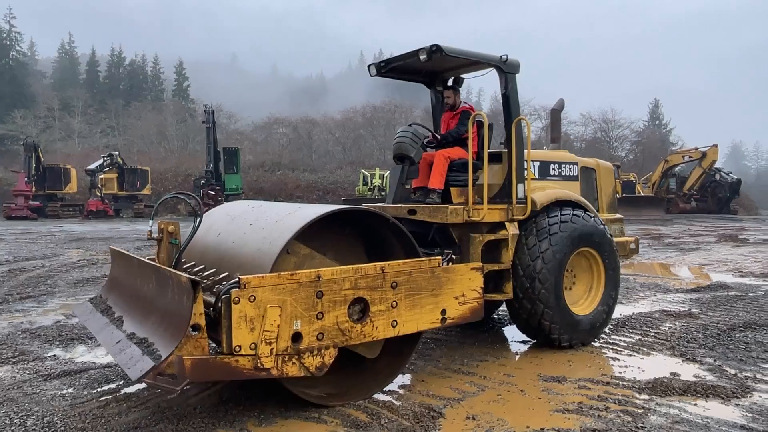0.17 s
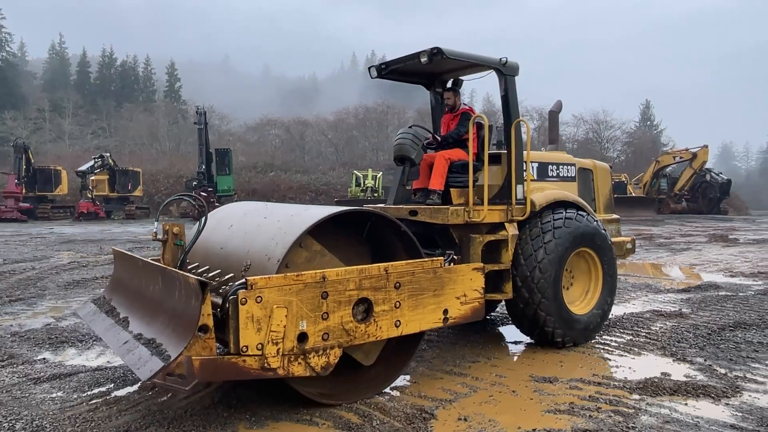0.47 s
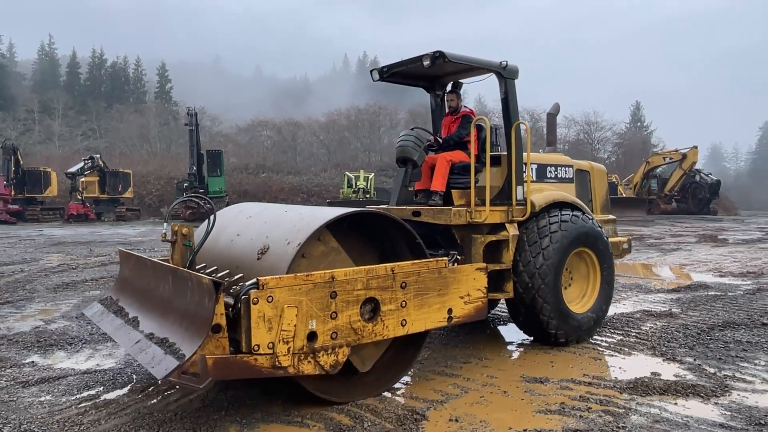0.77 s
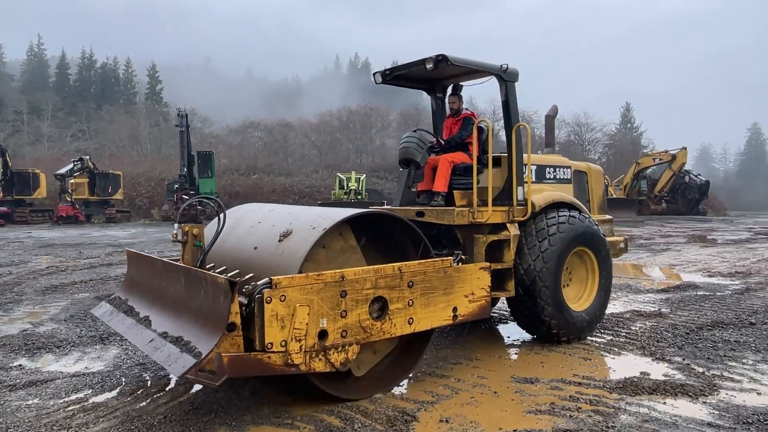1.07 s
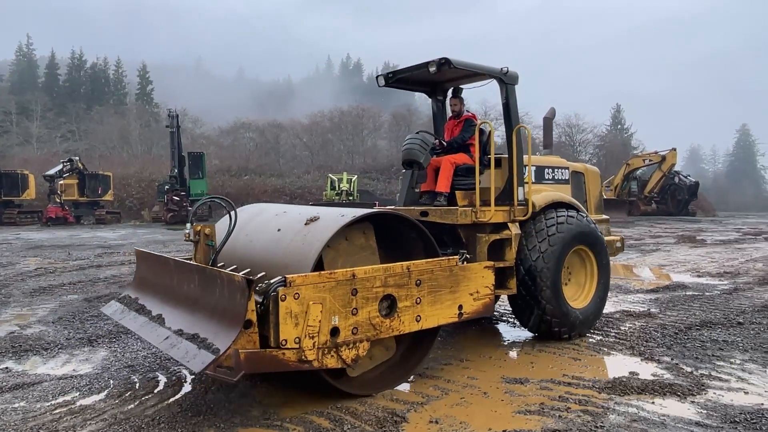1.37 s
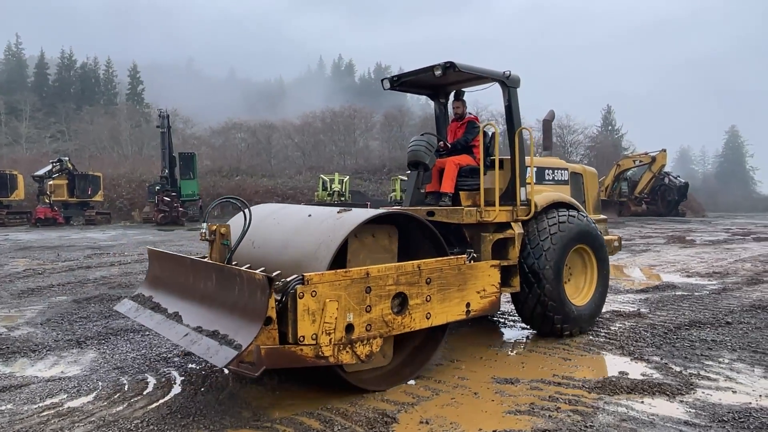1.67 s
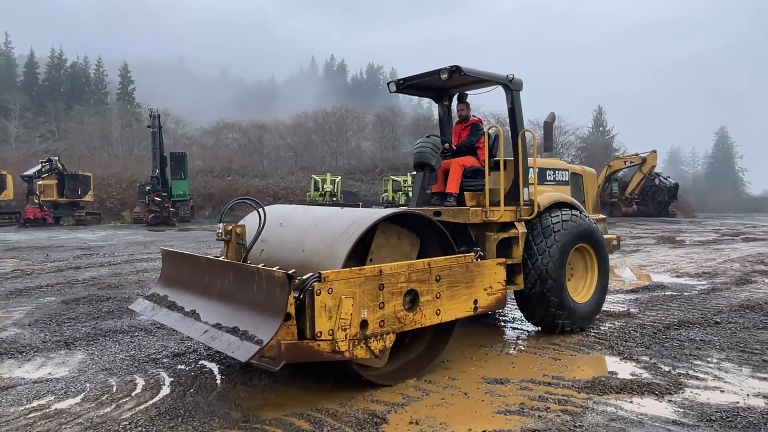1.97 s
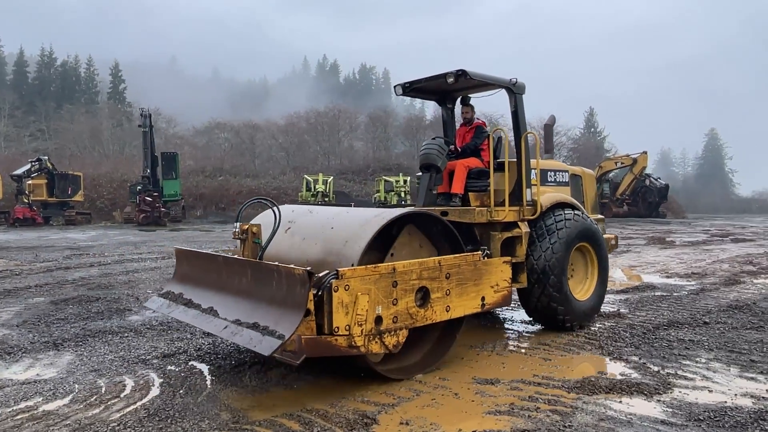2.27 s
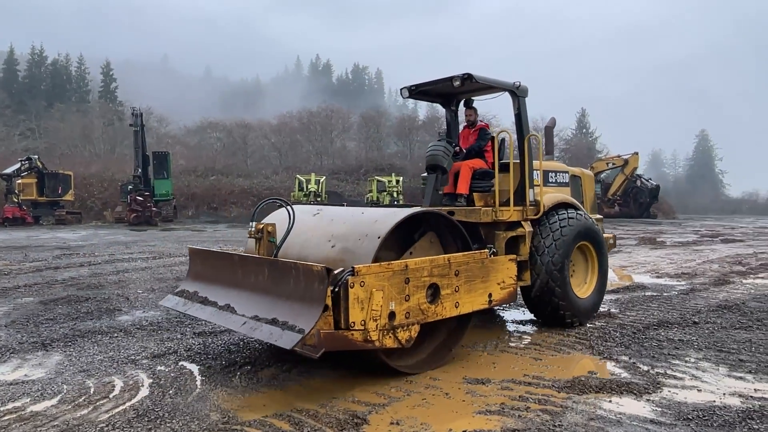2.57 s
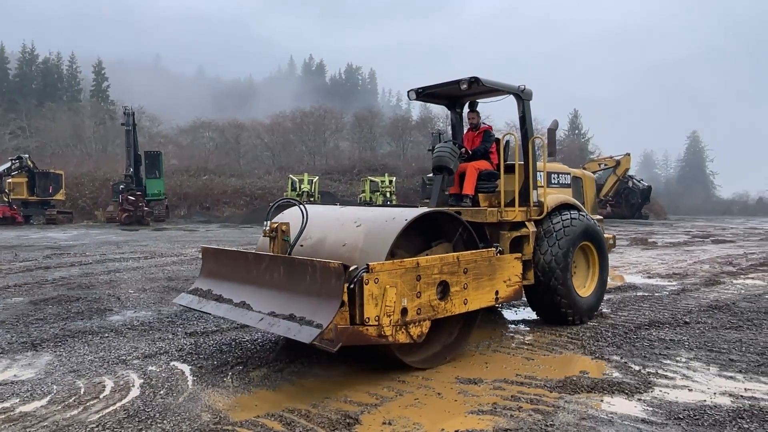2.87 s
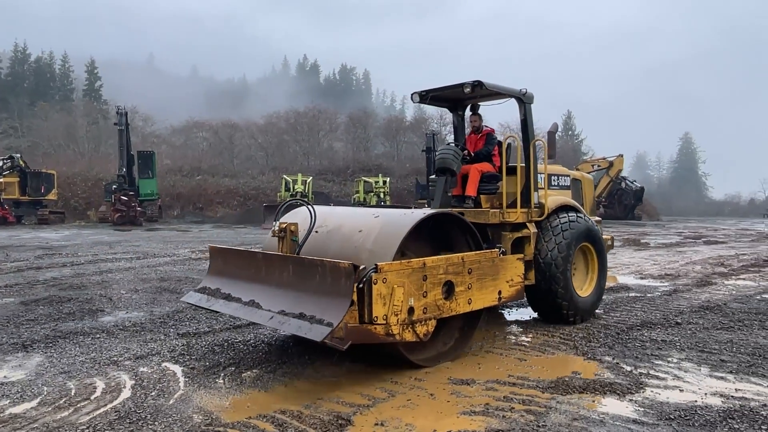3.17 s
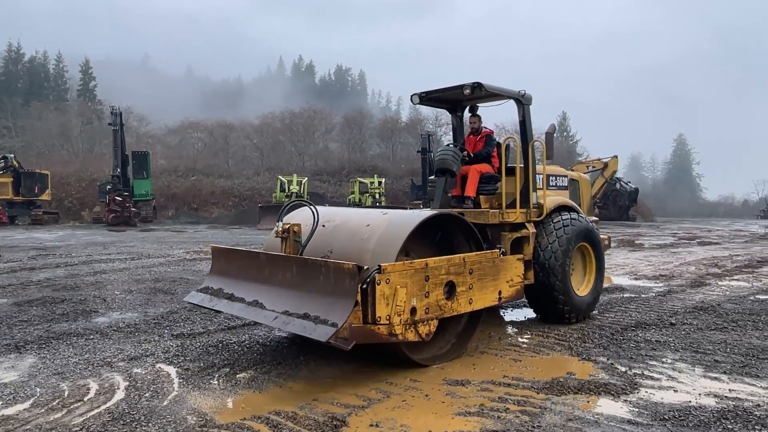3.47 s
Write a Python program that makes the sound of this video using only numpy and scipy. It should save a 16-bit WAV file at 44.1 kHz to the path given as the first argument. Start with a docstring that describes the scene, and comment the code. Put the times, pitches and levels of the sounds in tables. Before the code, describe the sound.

A diesel road roller drones and clatters a few metres from the microphone in an open wet yard, its steel drum rumbling and knocking on gravel, then grows quieter as it draws off.

```python
"""A diesel road roller creeps over a wet gravel yard, a few metres away, and slowly draws off.
From the start the exhaust drones at the firing rate, the engine clatters, the steel drum knocks on
stones and a panel drones; from 1 s the housing booms and crunches thicken, the drum rumbling most at 1.4 s.
A faint whistle peaks at 2 s; near 3 s the engine speeds up and its level drops.
Tones follow the engine cycle; clatter, rumble and grit are noise and clicks shaped by resonances."""
import sys
import numpy as np
from scipy import signal
from scipy.fft import rfft, irfft, next_fast_len
from scipy.io import wavfile
from scipy.ndimage import uniform_filter1d, minimum_filter1d, map_coordinates

SR = 44100
rng = np.random.default_rng(int(sys.argv[2]) if len(sys.argv) > 2 else 0)


def materialize(psi):
    """Save the field psi as 16-bit PCM at rate SR to the path in sys.argv[1].

    A 1-D psi becomes a single channel; in a 2-D psi each row is a channel.
    """
    bounded = np.clip(np.atleast_2d(psi).T, -1, 1)
    quanta = np.round(bounded * 32767).astype(np.int16)
    wavfile.write(sys.argv[1], SR, quanta)


N = 159201
TIME_S = np.arange(N) / SR

# engine speed: (time [s], firing rate [1/s])
FIRING_RATE = [(0.08, 57.7), (0.3, 57.72), (0.5, 57.06), (0.7, 56.51), (0.95, 57.22), (1.15, 56.7),
               (1.4, 55.88), (1.65, 55.98), (1.85, 56.63), (2.07, 56.82), (2.3, 56.33), (2.53, 57.27),
               (2.76, 58.05), (3.0, 59.28), (3.2, 59.87), (3.4, 59.57), (3.6, 58.06)]
# engine loudness: (time [s], level [dB], extra level of exhaust overtones [dB])
ENGINE_LEVEL = [(.1, -0.6, 2), (.55, -1, 1), (1.1, 0.3, 0.5), (1.45, 0, -1.5), (2.0, -0.5, -2),
                (2.5, -0.9, -0.5), (2.85, -1, 0.5), (3.2, -4, -0.5), (3.6, -4, 3)]
# rolling loudness: (time [s], level [dB])
ROLLING_LEVEL = [(.1, -28.5), (.3, -28), (.75, -29.5), (1.05, -25.5), (1.4, -20.5), (1.65, -23.5),
                 (1.95, -21.5), (2.2, -25.5), (2.45, -23.5), (2.9, -27.5), (3.25, -25.5), (3.48, -35),
                 (3.6, -31)]
# rolling spectrum slope: (frequency [Hz], relative level [dB])
ROLLING_COLOUR = [(120, -33), (280, 0.5), (400, -1.5), (620, -2.5), (780, -1), (1000, -3.5), (1200, -10),
                  (1500, -6), (2200, -8), (3200, -30), (8000, -54.5)]
# drum shell modes: (frequency [Hz], width [Hz], relative level [dB])
SHELL_MODES = [(304, 9, 4), (327, 14.5, 9), (416.6, 6.9, 8.5), (471, 9.2, 10.1), (497, 5.8, 8.9),
               (555, 8.1, 9.5), (601, 10.4, 8.5), (705.5, 12.6, 9.7), (726.5, 5.4, 11.5), (749, 12, 8.2),
               (774, 5.2, 8.9), (813.5, 7.7, 7.3), (875, 7.6, 9.7), (1107, 11, 4.6)]
HOUSING_HZ = 220  # resonance of the engine housing


def undb(db):
    """Decibels to gain."""
    return 10 ** (np.asarray(db) / 20)


def unit(x):
    """Scale to rms 1."""
    return x / np.sqrt(np.mean(x ** 2))


def curve(rows, column=1):
    """Join one column of timed rows by straight lines."""
    columns = np.array(rows).T
    return np.interp(TIME_S, columns[0], columns[column])


def walk(rate_hz):
    """Smooth random drift, rms 1, from rate_hz new values per second."""
    step = int(SR / rate_hz)
    held = np.repeat(rng.standard_normal(400), step)[:N]
    return unit(uniform_filter1d(uniform_filter1d(held, step), step))


def bins():
    """Frequencies of the padded spectrum, in Hz."""
    return np.maximum(np.fft.rfftfreq(next_fast_len(N), 1 / SR), 1)


def colour(rows, resonances=()):
    """Gain per frequency: a smooth slope with resonances standing on it."""
    f = bins()
    hz, db = np.array(rows).T
    slope = undb(np.interp(np.log(f), np.log(hz), db))
    peaks = sum((undb(2 * d) - 1) / (1 + (2 * (f - c) / width) ** 2) for c, width, d in resonances)
    return slope * np.sqrt(np.maximum(1 + peaks, 1 / 10))


def band(hz, half_width_hz):
    """Gain of a narrow resonance, halved at half_width_hz from its centre."""
    return 1 / (1 + ((bins() - hz) / half_width_hz) ** 2)


def near(f, hz, spread_oct):
    """Weight that falls away on both sides of hz, halved at spread_oct."""
    return 1 / (1 + (np.log2(f / hz) / spread_oct) ** 2)


def heard(pair, gain):
    """Colour two unrelated excitations and mix them to left and right, at rms 1."""
    # stereo image: (frequency [Hz], likeness [-1..1], left minus right [dB], left phase lead [rad])
    stereo_image = [(57, .9999, 4.5, -0.3), (170, 1, 0.9, 0.32), (323, 0.96, -0.7, -0.05),
                    (500, 0.96, 2, 1.13), (650, 0.84, 6, 0.12), (895, 0.91, 3, 0.4), (1190, 0.74, 5, 1.84),
                    (1364, 0.99, 4, -1), (1720, 0.015, 0.5, 1), (2020, 0.66, 0, .5), (3180, 0, 3, 2),
                    (4140, 0.22, 1.5, -1), (5030, 0, 4.5, -1.5), (6030, 0.11, 3, 0.4),
                    (7190, 0.62, 6.5, -2.1), (7730, 1, -1, -2.5), (9500, 1, -4, -6.5),
                    (9480, 0.71, 0, -4.5), (11400, 1, 0, -6), (13300, 0.99, 0.5, -4.5)]
    f, size = bins(), next_fast_len(N)
    hz, *columns = np.array(stereo_image).T
    like, balance_db, lead_rad = (np.interp(np.log(f), np.log(np.maximum(hz, 1)), c) for c in columns)
    like = np.clip(like, -1, 1)
    sign = np.array([[1], [-1]])  # left, right
    mid, side = rfft(pair, size) * gain
    both = mid * np.sqrt(1 + like) + sign * side * np.sqrt(1 - like)
    both = both * undb(sign * balance_db / 2) * np.exp(sign * 1j * lead_rad / 2)
    return unit(irfft(both, size)[:, :N])


def noise():
    """Two unrelated white noises."""
    return rng.standard_normal((2, N))


def grains(per_s, scatter_db):
    """Dense random clicks of uneven size."""
    clicks = rng.random(N) < per_s / SR
    size_db = scatter_db * np.minimum(rng.exponential(size=N), 4)
    return unit(noise() * clicks * undb(size_db))


def burst(start_s, rise_s, fade_s):
    """Quick linear rise, exponential fall."""
    age = np.maximum(TIME_S - start_s, 0)
    return np.minimum(age / rise_s, 1) * np.exp(-np.maximum(age - rise_s, 0) / fade_s)


def whistle():
    """A faint narrow noise band from the engine bay comes and goes, its pitch drifting by resampling."""
    # whistle loudness: (time [s], level [dB])
    whistle_level = [(.1, -62), (1.0, -57), (1.6, -54), (2.0, -48), (2.4, -59), (3.6, -62)]
    hz, half_width_hz, pitch_drift, waver_db = 4150, 45, 0.0087, 5
    tone = heard(noise(), band(hz, half_width_hz))
    place = np.cumsum(1 + pitch_drift * walk(4))
    drifting = np.array([map_coordinates(side, [place], mode="mirror") for side in tone])
    return undb(curve(whistle_level) + waver_db * walk(8)) * drifting


def whines():
    """Lightly damped panels sing on narrow tones that come and go, and fade as the roller draws off."""
    # singing panels: (frequency [Hz], half width [Hz], level before engine loudness [dB])
    singing_panels = [(929.4, 11, -37), (1398, 7.7, -38), (1030, 16, -43), (1308, 40, -42),
                      (1438, 6.3, -41), (1565, 11, -40), (2106, 13, -42.5), (2552, 23, -48.5)]
    waver_db = 2.5
    tones = 0
    for hz, half_width_hz, db in singing_panels:
        tones = tones + undb(db + waver_db * walk(8.98)) * heard(noise(), band(hz, half_width_hz))
    return undb(curve(ENGINE_LEVEL)) * tones


def booms():
    """Now and then the housing's resonance swells for a moment."""
    # swells: (centre time [s], level [dB], half length to 1/e [s])
    swells = [(1.02, -22.5, .06), (1.417, -22.5, 0.056), (1.84, -21, 0.058), (2.013, -20.5, 0.052),
              (2.166, -22, 0.067), (2.59, -22.5, 0.054), (2.862, -24.5, 0.043)]
    swell = sum(undb(db) * np.exp(-((TIME_S - centre_s) / length_s) ** 2) for centre_s, db, length_s in swells)
    return np.sqrt(2) * swell * np.cos(2 * np.pi * HOUSING_HZ * TIME_S + 0.89 * walk(12))


def housing(cycles):
    """Two beating hums, loudest where they meet the housing's resonance, its boom and a droning panel."""
    # machine hums: (multiple of firing rate [-], level at resonance before engine loudness [dB])
    machine_hums = [(3.72, -31.5), (4, -32)]
    # boom spectrum: (frequency [Hz], relative level [dB])
    boom_colour = [(20, -32), (42, -19), (62, -9.5), (88, -14), (140, -10.5), (185, -7), (214, 0),
                   (230, -5), (250, -3.5), (278, -13.5), (420, -29), (900, -53.5)]
    # droning panel loudness: (time [s], level [dB])
    drone_level = [(.1, -35), (.5, -28), (1.1, -30), (1.7, -40), (2.7, -37), (3.6, -49)]
    width_hz, hum_waver_db = 25, 2.5
    boom_db = -25.5  # before engine loudness
    drone_hz, drone_half_width_hz = 321.6, 10.5
    firing_hz = curve(FIRING_RATE)
    hums = 0
    for multiple, db in machine_hums:
        resonance = 1 / np.hypot(1, 2 * (multiple * firing_hz - HOUSING_HZ) / width_hz)
        tone = np.cos(2 * np.pi * multiple * cycles + 0.51 * walk(6.13))
        hums = hums + undb(db + hum_waver_db * walk(12)) * resonance * tone
    boom = undb(boom_db) * heard(noise(), colour(boom_colour))
    drone = heard(noise(), band(drone_hz, drone_half_width_hz))
    return undb(curve(ENGINE_LEVEL)) * (np.sqrt(2) * hums + boom) + undb(curve(drone_level)) * drone


def gravel():
    """Fine grit crackles as the drum rolls; now and then a stone is crushed or ticks."""
    # crushed stones: (start [s], level [dB], fade [s])
    crushed_stones = [(0.747, -37, 0.049), (0.842, -35, 0.054), (0.995, -35, 0.033), (1.26, -31.5, 0.049),
                      (1.35, -29.5, .05), (1.388, -28, 0.037), (1.419, -33, 0.026), (1.755, -31, .05),
                      (2.085, -35, 0.046), (2.348, -35, .03), (2.81, -33.5, 0.045), (3.06, -36, 0.1),
                      (3.28, -37, .025)]
    # grit spectrum: (frequency [Hz], relative level [dB])
    grit_colour = [(500, -22), (1500, -9), (2200, 4), (3200, 4.5), (4300, 1.5), (7000, -7.5),
                   (11500, -13.5), (14000, -29)]
    # sharp grit ticks: (start [s], level [dB], centre frequency [Hz])
    grit_ticks = [(.443, -38, 11500), (.76, -35.5, 10500), (1.386, -38, 10500), (2.095, -42, 11500),
                  (2.498, -45, 11800), (3.289, -40, 12300)]
    grit_per_s, grit_scatter_db = 3000, 2
    grit_db = -16.5  # relative to the rolling level
    tick_fade_s, tick_width_hz = 0.0091, 2400
    crush = sum(undb(db) * burst(start_s, 0.0081, fade_s) for start_s, db, fade_s in crushed_stones)
    steady = undb(grit_db + curve(ROLLING_LEVEL) + 2.5 * walk(20))
    grit = grains(grit_per_s, grit_scatter_db) + 1.1 * noise()
    out = np.hypot(crush, steady) * heard(grit, colour(grit_colour))
    for start_s, db, hz in grit_ticks:
        ring = 1 / np.hypot(1, 2 * (bins() - hz) / tick_width_hz)
        out = out + undb(db) * burst(start_s, .002, tick_fade_s) * heard(noise(), ring)
    return out


def drum():
    """Stones drive the hollow steel shell into a steady rumble."""
    rumble = heard(grains(2500, 1.7), colour(ROLLING_COLOUR, SHELL_MODES))
    return rumble * undb(curve(ROLLING_LEVEL) + 1.1 * walk(18))


def knocks():
    """Each stone grinds briefly against the drum, and the shell modes near its pitch ring on."""
    # stone knocks: (start [s], strength before grind and ring gains [dB], centre frequency [Hz], grind fade [s])
    stone_knocks = [(0.086, -16, 980, 0.053), (.489, -24.5, 850, 0.041), (.54, -22, 326, .05),
                    (.829, -24.5, 750, 0.042), (.94, -31, 796, 0.058), (0.997, -18, 725, 0.04),
                    (1.068, -16, 1000, 0.04), (1.07, -17, 322, 0.03), (1.175, -24, 328, 0.027),
                    (1.256, -14.5, 786, 0.059), (1.28, -21, 2100, .025), (1.349, -20.5, 422, 0.047),
                    (1.4, -18.5, 476, 0.046), (1.509, -20.5, 580, .04), (1.535, -25, 2100, .035),
                    (1.684, -18.5, 523, 0.044), (1.769, -22.5, 332, 0.038), (1.785, -20, 1400, 0.047),
                    (1.904, -14.5, 478, 0.044), (1.96, -22.5, 690, 0.06), (2.1, -22, 1100, .035),
                    (2.405, -20, 345, 0.075), (2.538, -29, 794, 0.029), (2.799, -24, 324, 0.052),
                    (2.83, -20, 1300, 0.035), (3.069, -24.5, 700, 0.05)]
    rise_s, grind_db, grind_spread_oct = 0.003, -2.5, 0.39
    ring_db, ring_spread_oct, ring_damping = -13.5, .16, 0.67
    size = SR // 2
    age = np.arange(size) / SR
    f = np.maximum(np.fft.rfftfreq(size, 1 / SR), 1)
    mode_hz, width_hz, mode_db = np.array(SHELL_MODES).T
    modes = np.exp(np.outer(2j * np.pi * mode_hz - np.pi * width_hz * ring_damping, age))
    grinding = heard(noise(), colour(ROLLING_COLOUR, SHELL_MODES))
    grinds, rings = np.zeros((2, 2, N + size))
    for start_s, db, hz, fade_s in stone_knocks:
        at = int(start_s * SR) + np.arange(size)
        attack = undb(db) * np.minimum(age / rise_s, 1)
        grind = unit(irfft(rfft(grinding[:, at % N]) * near(f, hz, grind_spread_oct), size))
        phase = np.exp(2j * np.pi * rng.random((2, len(SHELL_MODES))))
        struck = undb(ring_db + mode_db) * near(mode_hz, hz, ring_spread_oct) * phase
        grinds[:, at] += attack * np.exp(-age / fade_s) * grind
        rings[:, at] += attack * (struck @ modes).real
    rings = rings[:, :N]
    return undb(grind_db) * grinds[:, :N] + rings.std() * heard(rings, 1)


def clatter(cycles):
    """Combustion and valve gear rattle the panels twice a firing; part repeats every engine cycle."""
    # clatter loudness: (time [s], level [dB])
    clatter_level = [(.1, -25.5), (.65, -23.5), (1.05, -23), (1.4, -24), (1.85, -24.5), (2.25, -26.5),
                     (2.8, -28), (3.05, -32), (3.6, -30)]
    # clatter spectrum slope: (frequency [Hz], relative level [dB])
    clatter_colour = [(150, -32), (330, -4.5), (600, -2.5), (950, 1), (1190, 0), (1450, 1.5), (1800, -6),
                      (2550, -5.5), (3000, -10.5), (3600, -16.5), (5000, -20.5), (7000, -22.5),
                      (11500, -31), (14000, -36)]
    # panel resonances: (frequency [Hz], width [Hz], height above slope [dB])
    panel_resonances = [(353, 28, 7.6), (435, 24, 3.8), (1045, 51, 2.5), (3400, 42, 2), (4080, 250, 4),
                        (4875, 150, 8.3), (5400, 100, 3)]
    stroke_depth, stroke_decay_strokes, stroke_scatter_db = 0.19, 0.5, 4.5
    repeat_share = 0.45  # of the power
    taps_per_s, tap_scatter_db = 2400, 1.5  # loose parts
    ripple_db, ripple_hz = 1.77, 45.05  # reflections off the steel frame
    strokes = 2 * cycles
    size = undb(stroke_scatter_db * rng.standard_normal(1000))[strokes.astype(int)]
    gate = 1 + stroke_depth * size * np.exp(-(strokes % 1) / stroke_decay_strokes)
    engine_phase = cycles / 4 % 1  # four firings per engine cycle
    repeating = rng.standard_normal((2, 3000))[:, (engine_phase * 3000).astype(int)]
    taps = grains(taps_per_s, tap_scatter_db)
    rattle = np.sqrt(repeat_share) * repeating + np.sqrt(1 - repeat_share) * taps
    ripple = undb(ripple_db * np.interp(bins() / ripple_hz, np.arange(1000), rng.standard_normal(1000)))
    shaped = heard(rattle * gate, colour(clatter_colour, panel_resonances) * ripple)
    return shaped * undb(curve(clatter_level) + 1.53 * walk(22.45))


def exhaust(cycles):
    """Firing tones; the overtones swell and sink against the fundamental as the roller moves."""
    # exhaust tones: (multiple of firing rate [-], level before engine loudness [dB], waver [dB])
    exhaust_tones = [(1, -11, 0.1), (2, -34.5, 1.5), (3, -22.5, 0.4)]
    pulse_skew_rad = 0.56  # lean of each firing pulse
    overtone_db = curve(ENGINE_LEVEL, 2)
    tones = 0
    for multiple, db, waver_db in exhaust_tones:
        gain = undb(db + waver_db * walk(14) + overtone_db * (multiple > 1))
        tones = tones + gain * np.cos(2 * np.pi * round(multiple) * cycles + pulse_skew_rad)
    return np.sqrt(2) * undb(curve(ENGINE_LEVEL)) * tones


def scene():
    """Gravel, drum, housing and engine together."""
    cycles = np.cumsum(curve(FIRING_RATE)) / SR  # firings so far
    background = whistle() + whines() + booms() + housing(cycles)
    ground = gravel() + drum() + knocks()
    return background + ground + clatter(cycles) + exhaust(cycles)


def record(dry):
    """Silence until the sound opens; a quick limiter holds the peaks and a low-pass cuts the top."""
    start_s, open_s, top_hz = .083, 0.0007, 13100
    ceiling, limiter_s = .93, .008
    x = dry * np.clip((TIME_S - start_s) / open_s, 0, 1)
    span = int(limiter_s * SR)
    needed = ceiling / np.maximum(np.abs(x).max(axis=0), ceiling)
    gain = uniform_filter1d(minimum_filter1d(needed, 2 * span), span)
    low_pass = signal.ellip(8, .2, 80, top_hz, fs=SR, output="sos")
    return signal.sosfilt(low_pass, x * gain)


dry = scene()
out = record(dry)
materialize(out)
```